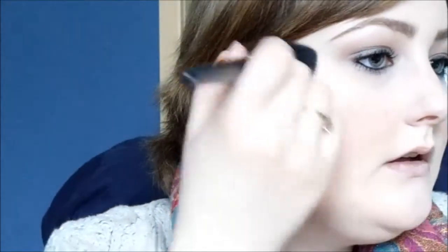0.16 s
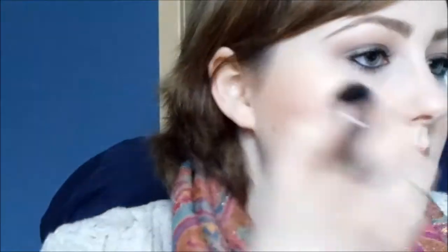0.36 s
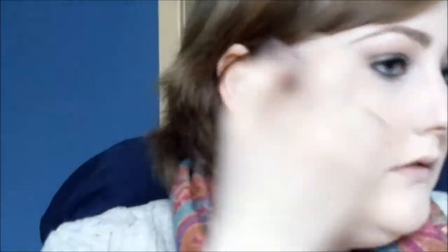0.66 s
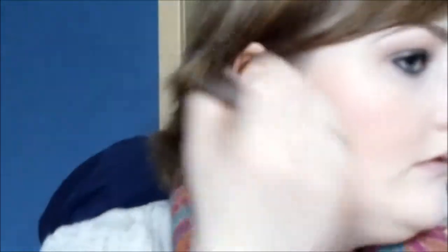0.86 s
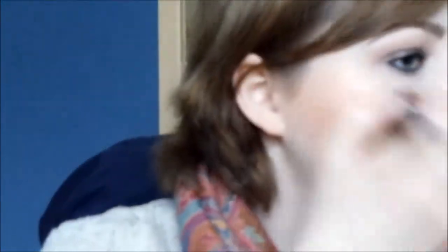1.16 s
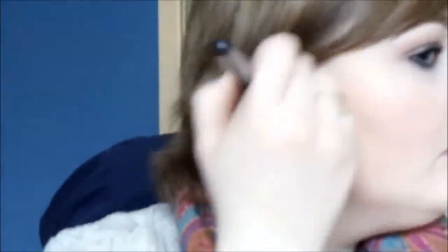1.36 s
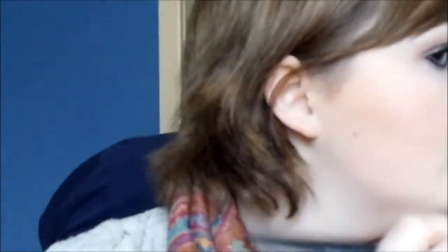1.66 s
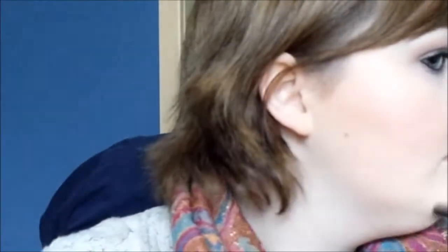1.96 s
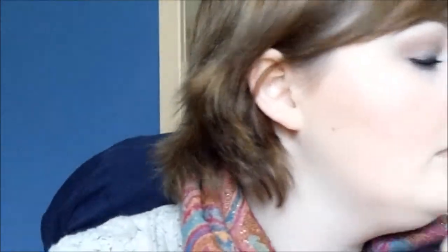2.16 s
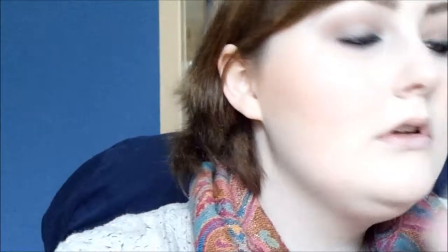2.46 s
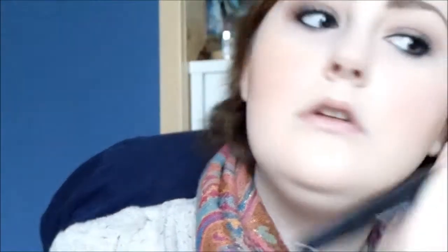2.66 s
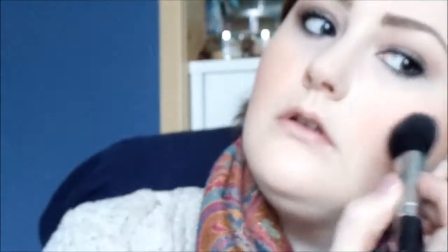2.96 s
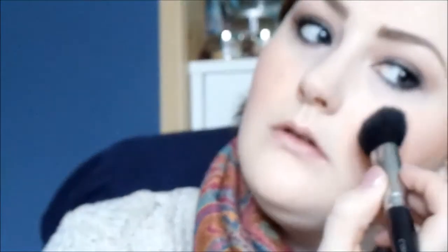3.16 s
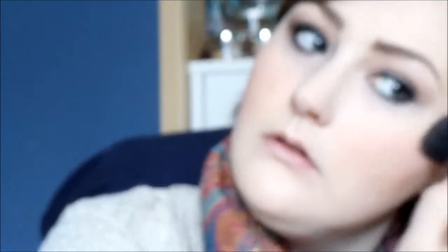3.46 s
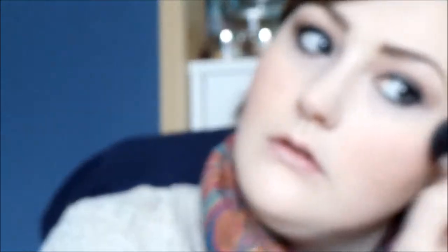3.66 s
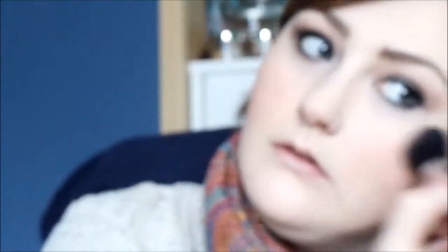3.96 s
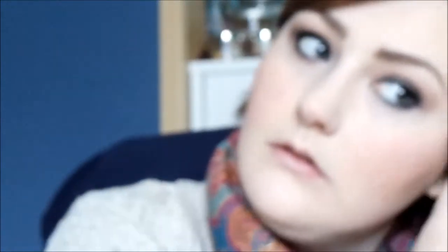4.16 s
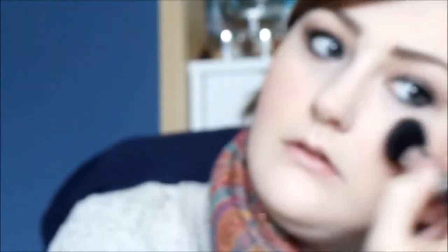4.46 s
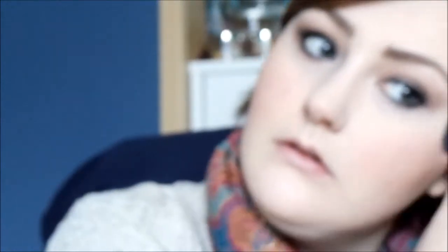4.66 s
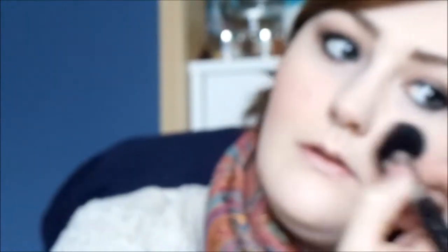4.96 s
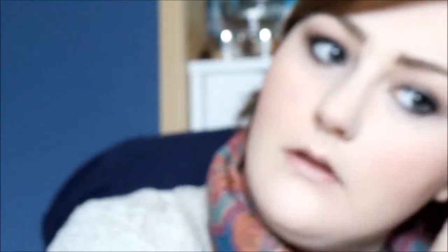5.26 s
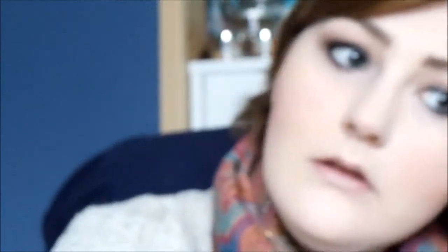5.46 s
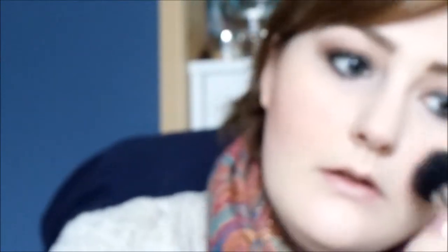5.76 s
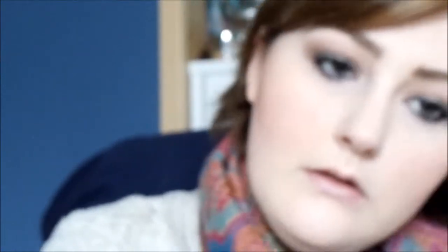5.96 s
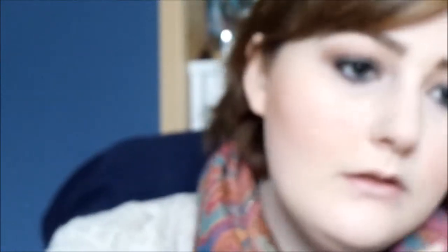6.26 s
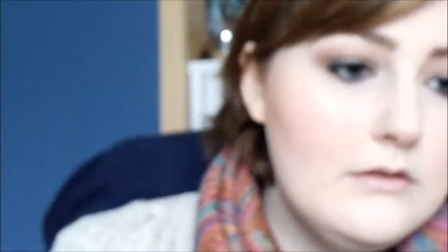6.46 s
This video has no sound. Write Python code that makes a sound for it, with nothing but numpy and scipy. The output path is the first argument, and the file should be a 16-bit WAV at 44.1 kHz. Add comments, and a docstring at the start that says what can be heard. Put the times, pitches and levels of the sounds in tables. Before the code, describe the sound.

Soft brush strokes on a cheek and tiny handle ticks, broken by a single sharp plastic clack, over low room hiss.

```python
"""In a small, quiet room, a makeup brush is swept to and fro over a cheek.
The bristles barely hiss as they flick over the skin. Small dry creaks and ticks come in spells,
about ten a second, probably from the handle sticking and slipping in the grip.
Something of hard plastic clacks sharply once, and later there are two light taps.
A faint far clock, a low rumble, hiss and a thin whine lie underneath."""
import sys
import numpy as np
from scipy import signal
from scipy.fft import rfft, irfft
from scipy.io import wavfile

SR = 44100
rng = np.random.default_rng(int(sys.argv[2]) if len(sys.argv) > 2 else 0)


def inscribe(sig):
    """Save sig as 16-bit PCM at rate SR to the path in sys.argv[1].

    A 1-D sig is mono; a 2-D sig holds one channel per row.
    Samples are clipped to [-1, 1] before scaling.
    """
    pcm = np.round(np.clip(np.atleast_2d(sig).T, -1, 1) * 32767)
    wavfile.write(sys.argv[1], SR, pcm.astype(np.int16))


N = 291927
TIME = np.arange(N) / SR
SLIP_GAP_S = .0145   # usual time between the slips of one creak


def from_db(db):
    """Turn decibels into a number to multiply a sound by."""
    return 10 ** (np.asarray(db) / 20)


def coloured(sound, spectrum):
    """Shape a sound with (pitch_hz, level_db) rows, then set its average strength (rms) to 1."""
    hz, db = np.transpose(spectrum)
    bins_hz = np.maximum(np.fft.rfftfreq(len(sound), 1 / SR), 1)
    gains = from_db(np.interp(np.log(bins_hz), np.log(hz), db))
    shaped = irfft(rfft(sound) * gains, len(sound))
    return shaped / np.sqrt(np.mean(shaped ** 2) + 1e-20)


def resonate(force, hz, width_hz):
    """Ring at one pitch; the narrower the width, the longer the ring."""
    r = np.exp(-np.pi * width_hz / SR)
    feedback = [1, -2 * r * np.cos(2 * np.pi * hz / SR), r * r]
    return signal.lfilter(np.array([1, 0, -1]) * (1 - r * r) / 2, feedback, force)


def add(track, start_s, sound):
    """Mix a sound into a track at a given time."""
    at = int(start_s * SR)
    track[at:at + len(sound)] += sound[:N - at]


def swells(rows, rest_db):
    """A loudness curve: a steady level with smooth, bell-shaped rises."""
    power = sum(from_db(db) ** 2 * np.exp(-(2 * (TIME - middle_s) / length_s) ** 2)
                for middle_s, length_s, db in rows)
    return np.sqrt(from_db(rest_db) ** 2 + power)


def contact(force, modes, treble_db, ring, band_hz):
    """A force makes an object ring at its own pitches (modes); the result always has the same energy."""
    ringing = sum(from_db(db) * resonate(force, hz, width_hz / ring) for hz, width_hz, db in modes)
    # a small object gives off no bass, and a soft contact limits the highs
    ringing = signal.sosfilt(signal.butter(2, band_hz, "band", fs=SR, output="sos"), ringing)
    # a harder contact lifts the treble against the middle
    filters = [signal.butter(2, 4600, side, fs=SR, output="sos") for side in ("low", "high")]
    middle, treble = (signal.sosfilt(np.tile(sos, (2, 1)), ringing) for sos in filters)
    sound = middle + from_db(treble_db) * treble
    tick_s = .0023   # the energy is that of a sound of strength 1 lasting this long
    return sound / np.sqrt(np.sum(sound ** 2) / (tick_s * SR))


def room(sound, fade_s=0.29, first_echo_s=0.0039):
    """Many echoes follow a sound after a short gap, dying away by 60 dB in fade_s."""
    # the tone of the room's echo: pitch_hz, level_db
    echo_tone = [(200, 22.5), (400, 8.5), (900, 7.5), (1200, 6.5), (2000, 0), (4500, 1.5), (7000, -3.5),
                 (10000, -2), (14000, -2)]
    t = TIME[:SR // 2]
    noise = coloured(rng.standard_normal(len(t)), echo_tone)
    echoes = noise * from_db(-60 * t / fade_s) * (t > first_echo_s)
    return signal.fftconvolve(sound, echoes / np.sqrt(np.sum(echoes ** 2)))[:len(sound)]


def background(hiss_db=-48, rumble_db=-46.5, whine_db=-78):
    """Room noise and hiss, a deep uneven rumble and a thin electronic whine."""
    # the tone of the steady room noise: pitch_hz, level_db
    hiss_tone = [(7.1, -36), (12, 6.5), (19, -6.5), (33, -9), (80, -13), (131, -15.5), (230, -19.5),
                 (559, -27), (1040, -33.5), (1720, -36), (2450, -39), (7100, -45.5), (7750, -46),
                 (8990, -47.5), (14000, -50.5)]
    # where the rumble grows louder: middle_s, length_s, level_db
    rumble_swells = [(1.75, 0.42, -33.5), (2.65, 0.54, -39)]
    hiss = from_db(hiss_db) * coloured(rng.standard_normal(N), hiss_tone)
    rumble_tone = [(1, -2), (4, 3.0), (9, 4), (20, -20.5), (60, -38), (300, -90)]
    rumble = coloured(rng.standard_normal(N), rumble_tone)
    wander = coloured(rng.standard_normal(N), [(60, 3), (600, -33), (6000, -90)])
    whine_hz = 7860 + 50 * wander
    whine = np.sqrt(2) * np.sin(2 * np.pi * np.cumsum(whine_hz) / SR)
    return hiss + swells(rumble_swells, rumble_db) * rumble + from_db(whine_db) * whine


def clock(first_s, level_db, blur_s):
    """A clock across the room ticks once a second, blurred by distance."""
    # how the clock's case rings: pitch_hz, width_hz, level_db
    case_modes = [(900, 250, 9.5), (2000, 380, 0.5), (2880, 420, -9), (4100, 280, -5)]
    out, t = np.zeros(N), TIME[:SR // 4]
    for start_s in np.arange(first_s, N / SR):
        blur = rng.standard_normal(len(t)) * t / blur_s * np.exp(-t / blur_s)
        tick = contact(blur, case_modes, treble_db=0, ring=1, band_hz=(500, 7000))
        add(out, start_s, from_db(level_db) * tick)
    return out


def knocks(hits, modes, scrape_gain, scrape_s, band_hz, echo_db):
    """Hard hits on one object: each is a snap and a brief scrape, with its own room echo."""
    out, t = np.zeros(N), TIME[:SR // 2]
    snap = t == 0
    for start_s, db, treble_db, ring in hits:
        scrape = scrape_gain * rng.standard_normal(len(t)) * (np.exp(-t / scrape_s) + 1e-18)
        knock = from_db(db) * contact(snap + scrape, modes, treble_db, ring, band_hz)
        add(out, start_s, knock + from_db(echo_db) * room(knock))
    return out


def light_taps():
    """Two light taps make an object ring briefly."""
    # the taps: start_s, level_db, treble_db, ring_factor (bigger rings longer)
    hits = [(4.9581, -37.5, -10, 1.4), (6.4261, -47, 5, 0.77)]
    # how the tapped object rings: pitch_hz, width_hz, level_db
    modes = [(1690, 260, 3), (2410, 540, -8), (3320, 340, 3.5), (4480, 280, 2), (7100, 700, -22)]
    return knocks(hits, modes, scrape_gain=0.028, scrape_s=.0006, band_hz=(900, 5500), echo_db=-7.5)


def plastic_clack():
    """Hard plastic hits three times so quickly that it sounds like one clack."""
    # the hits: start_s, level_db, treble_db, ring_factor (bigger rings longer)
    hits = [(2.3238, -12.5, -12, 0.4), (2.3258, -15, 3, 1.55), (2.3272, -16.5, 2.5, 1.4)]
    # how the plastic rings: pitch_hz, width_hz, level_db
    modes = [(406, 128, 2), (813, 58, 0.5), (880, 52, 3), (955, 47, -0.5), (1620, 150, -2), (1930, 220, 7),
             (2220, 260, 3), (2400, 110, 6.5), (2980, 260, 2.5), (3360, 190, 5.5), (3960, 200, 9),
             (4650, 150, 2.5), (4830, 200, -1), (5400, 290, 4), (6180, 190, 1), (7030, 300, -7),
             (8900, 590, -9), (10140, 520, -3.5), (11460, 400, -16), (12600, 700, -24)]
    return knocks(hits, modes, scrape_gain=0.14, scrape_s=0.00049, band_hz=(660, 12500), echo_db=-5.5)


def bristles(flicks_per_s, spread_db, light_touch_db):
    """Many hairs flick over the skin, each with a tiny click of its own size."""
    # firmer strokes of the brush: middle_s, length_s, level_db
    strokes = [(.04, 0.046, -53.5), (.135, .07, -59.5), (1.09, .2, -63), (1.82, .25, -70),
               (2.57, 0.28, -61), (3.0, .35, -69), (3.41, .13, -64), (3.78, 0.076, -58), (4.05, .25, -68.5),
               (5.62, 0.57, -70), (6.42, 0.27, -61.5)]
    # the tone of hairs on skin: pitch_hz, level_db
    hair_tone = [(300, -28), (600, 2.5), (1100, 4), (1600, -2.5), (2500, -1), (3500, -7), (4600, -7.5),
                 (6500, -17), (10000, -16), (14000, -27)]
    sizes = from_db(spread_db * np.minimum(rng.exponential(1, N), 4)) * rng.choice([-1, 1], N)
    flicks = sizes * (rng.random(N) < flicks_per_s / SR)
    return swells(strokes, light_touch_db) * coloured(flicks, hair_tone)


def faint_slips(per_creak=3, beat_s=.1, first_s=.004, jitter_s=.002, loss_db=0.7, spread_db=1.5):
    """List the slips of faint creaks: on an even beat, each is a short run that tends to weaken."""
    # spells of faint creaking: start_s, end_s, level_db, treble_db
    spells = [(0, .3, -49, -23), (1.4, 2.1, -53.5, -8), (2.5, 3.4, -51, -1.5)]
    rows = []
    for start_s, end_s, db, treble_db in spells:
        for beat in range(round(start_s / beat_s), round(end_s / beat_s)):
            for k, (late, strong) in enumerate(rng.standard_normal((per_creak, 2))):
                time_s = beat * beat_s + first_s + k * SLIP_GAP_S + jitter_s * late
                rows.append((time_s, db - k * loss_db + spread_db * strong, treble_db))
    return rows


def all_slips(lead_s=.0035, lead_db=-10):
    """List every slip: clear ticks, a little give in the grip before each, and faint slips between."""
    # the clear ticks: time_s, level_db, treble_db
    ticks = [(0.0075, -43.5, -26), (0.115, -48, -13), (0.3015, -47, -12), (0.4085, -48, -10),
             (0.5952, -43.5, -7.5), (0.7011, -43.5, -13), (0.8025, -46, -13), (0.8155, -46.5, -28),
             (0.902, -45.5, -18), (1.1095, -37.5, 7.5), (1.2046, -41, -1), (1.219, -45, 5),
             (1.3134, -42.5, 0), (1.3966, -44.5, -3), (1.8115, -43.5, -1), (1.9187, -48.5, 4),
             (2.1037, -43.5, 7), (2.134, -43, 15), (2.2084, -46, 3), (2.224, -45, 20), (2.2382, -39, 2.5),
             (2.3079, -35.5, 0.5), (2.4198, -44.5, 13), (2.433, -43.5, -3), (2.9052, -42.5, 19),
             (2.9345, -44, 10), (3.005, -44.5, 11), (3.02, -40.5, 2), (3.035, -46, -15), (3.1086, -42.5, 1),
             (3.5088, -40, 5), (3.5378, -44, 10), (3.6212, -41, 11.5), (3.699, -37, 3),
             (6.6032, -45.5, 0.5)]
    leads = [(time_s - lead_s, db + lead_db, treble_db) for time_s, db, treble_db in ticks]
    # a clear tick eases the grip, so no faint slip falls right beside it
    faint = [slip for slip in faint_slips()
             if min(abs(slip[0] - tick[0]) for tick in ticks) > SLIP_GAP_S / 2]
    return list(ticks) + leads + faint


def handle_creaks(slip_s, softness, spread_db):
    """The handle sticks and slips in tiny jerks: each is a gritty burst that swells and stops."""
    # how the handle rings: pitch_hz, width_hz, level_db
    handle_modes = [(1150, 320, 7.5), (2546, 440, 7), (3030, 560, 6.5), (3500, 250, 5.5), (4920, 950, 2),
                    (6090, 200, 4.5), (7180, 420, 4), (8740, 300, 1.5), (10700, 760, -13),
                    (12900, 1200, -13)]
    out = np.zeros(N)
    for time_s, level_db, treble_db in all_slips():
        swell_s = slip_s * from_db(-softness * treble_db)   # dull slips last longer
        age = TIME[:SR // 30] / swell_s
        burst = rng.standard_normal(len(age)) * age * np.exp(-age)
        modes = [(hz, width_hz, db + rng.normal(0, spread_db)) for hz, width_hz, db in handle_modes]
        tick = contact(burst, modes, treble_db, ring=0.91, band_hz=(650, 13000))
        add(out, max(time_s - swell_s, 0), from_db(level_db) * tick)
    return out


def scene():
    """Mix everything; the close creaks have less echo than the clack and the taps."""
    creaks = handle_creaks(slip_s=.0005, softness=0.33, spread_db=0.5)
    brush = creaks + from_db(-8.0) * room(creaks)
    brush += bristles(flicks_per_s=2000, spread_db=3.0, light_touch_db=-74)
    hits = plastic_clack() + light_taps()
    far = clock(first_s=.925, level_db=-45, blur_s=0.028) + background()
    return (brush + hits + far)[None]


def record(dry, cutoff_hz=14150):
    """Round off the loudest peak and cut the very highest pitches."""
    rounded = 0.61 * np.tanh(dry / 0.58)
    return signal.sosfilt(signal.ellip(12, .1, 80, cutoff_hz, fs=SR, output="sos"), rounded)


dry = scene()
out = record(dry)
inscribe(out)
```